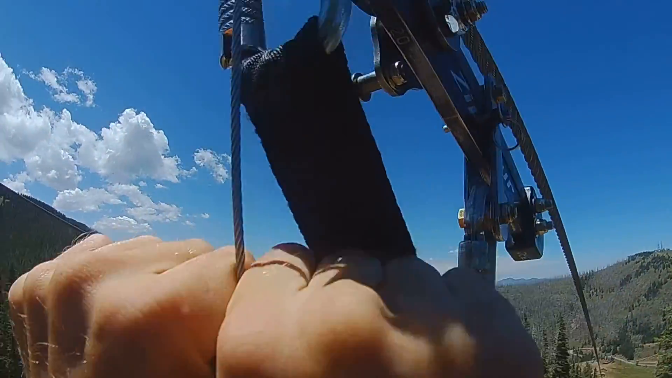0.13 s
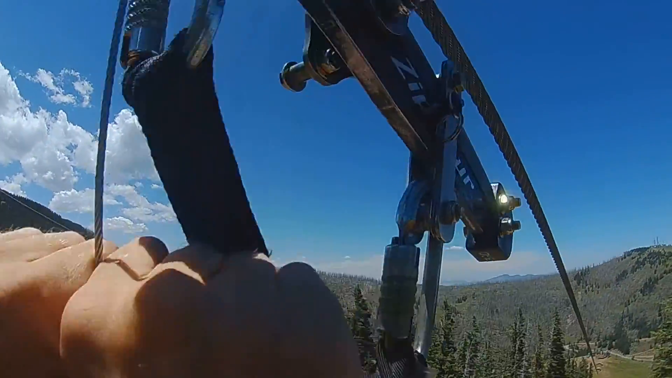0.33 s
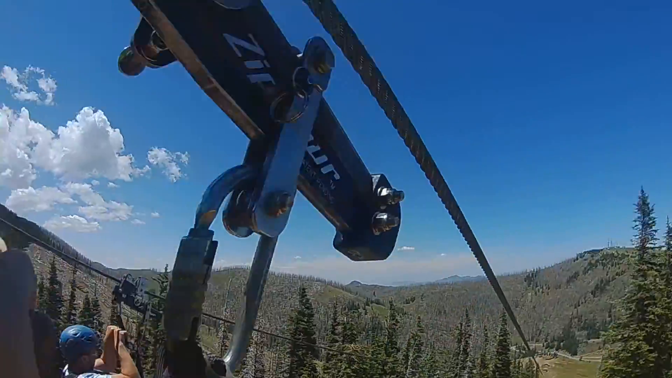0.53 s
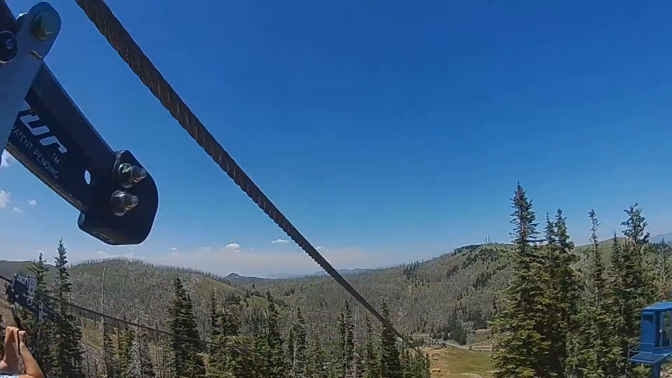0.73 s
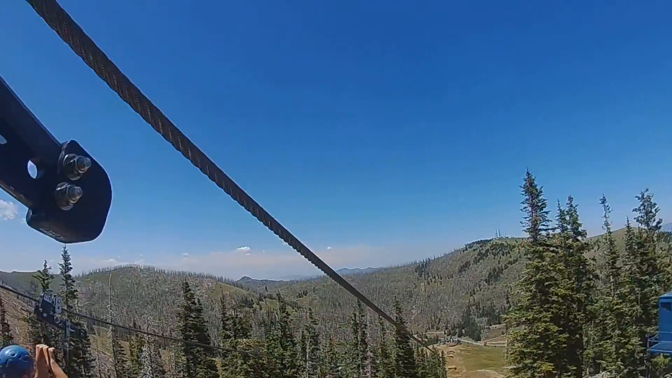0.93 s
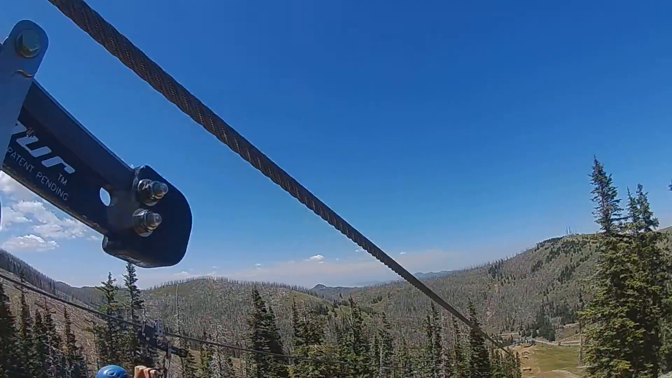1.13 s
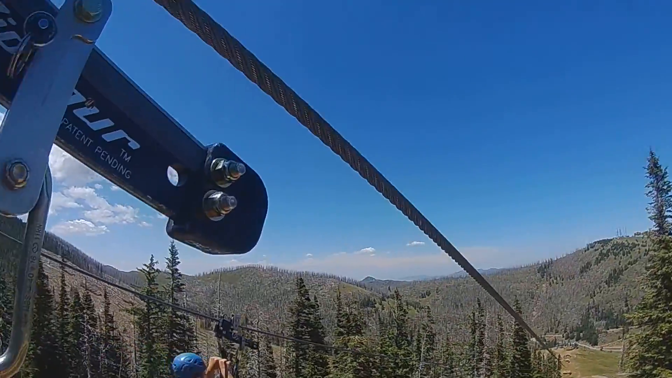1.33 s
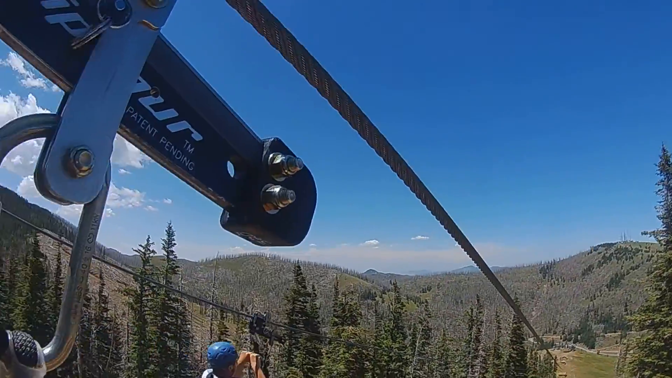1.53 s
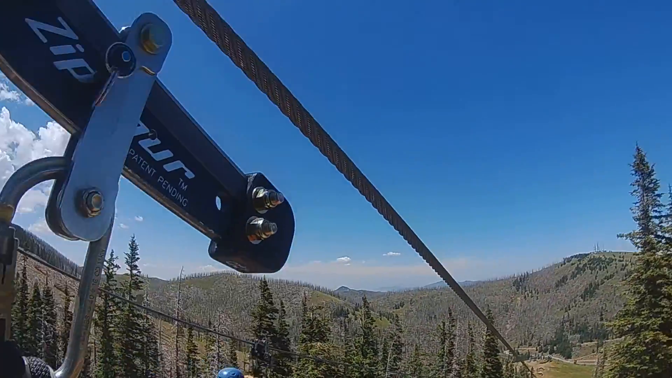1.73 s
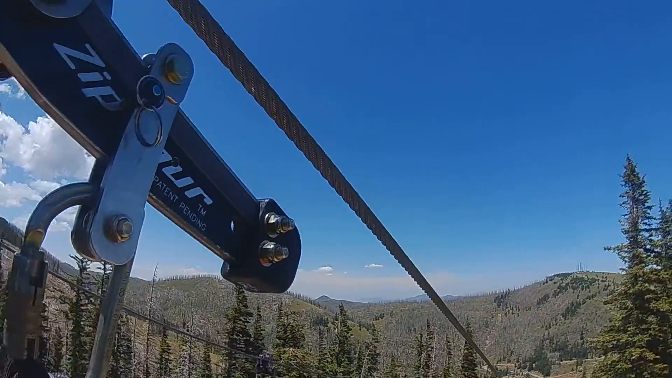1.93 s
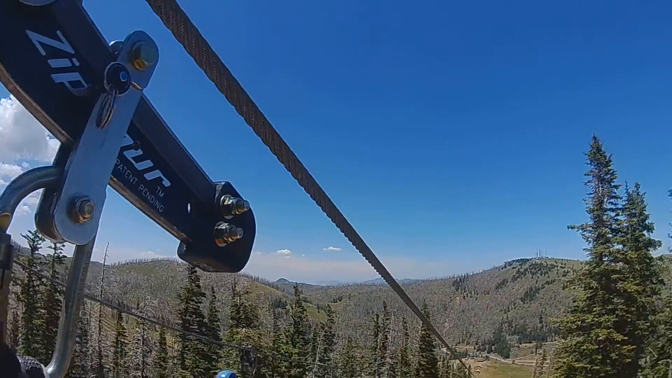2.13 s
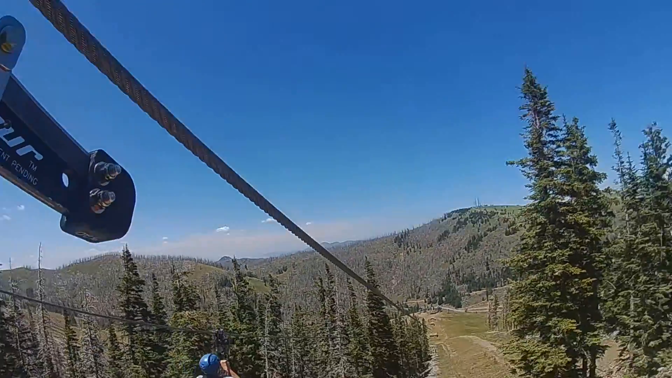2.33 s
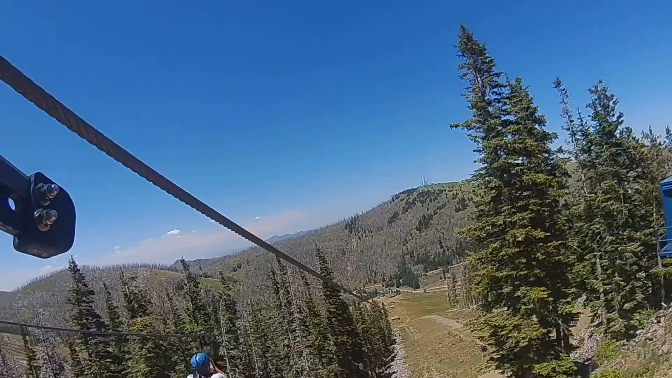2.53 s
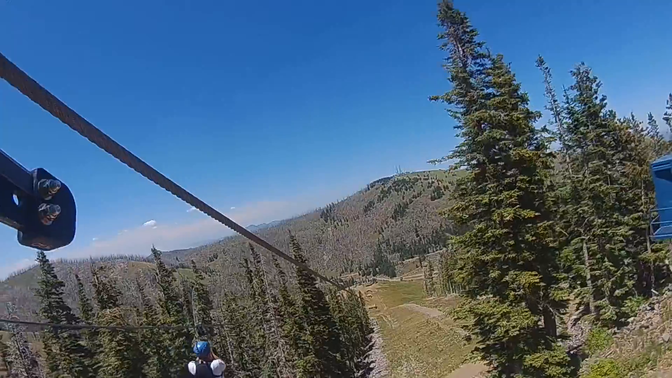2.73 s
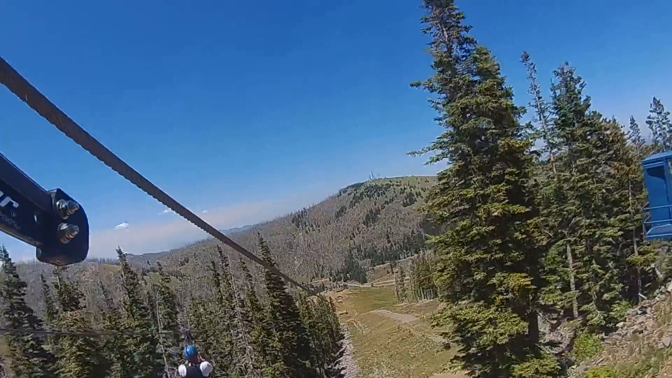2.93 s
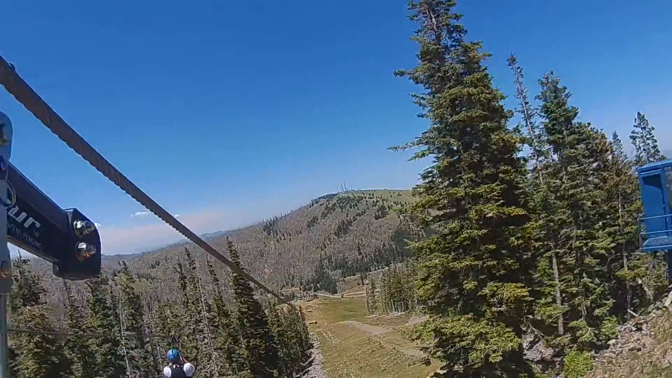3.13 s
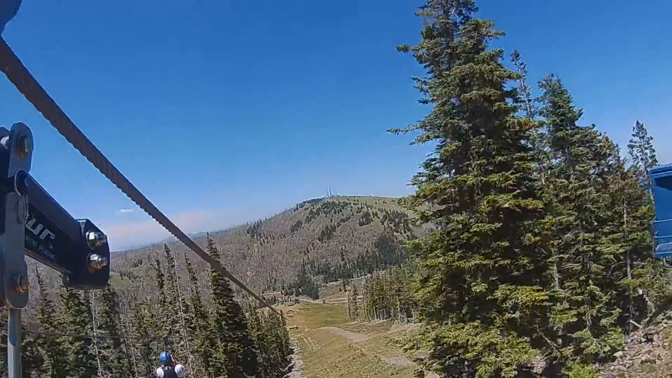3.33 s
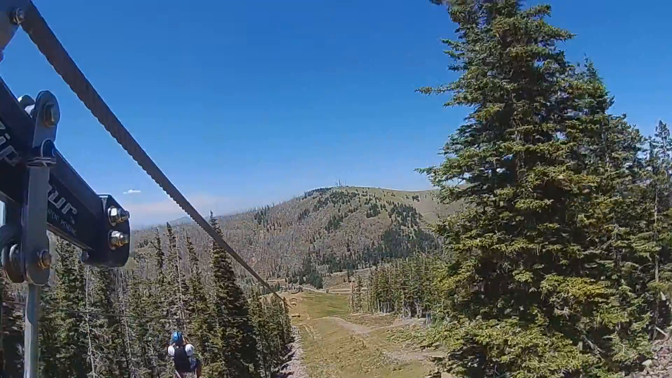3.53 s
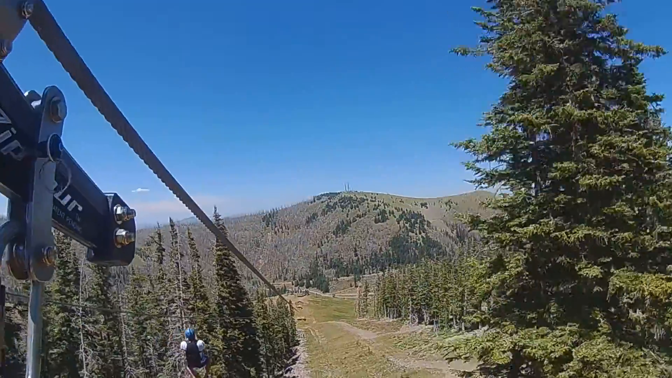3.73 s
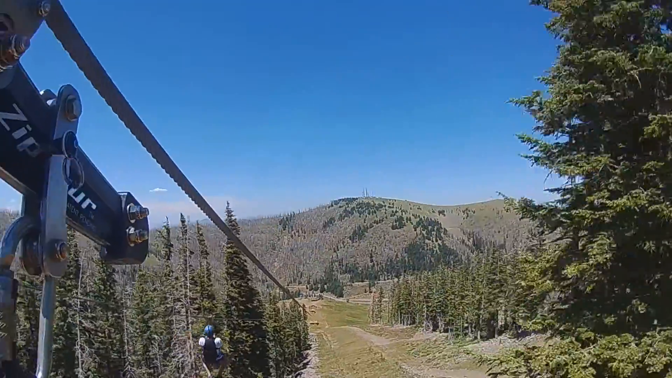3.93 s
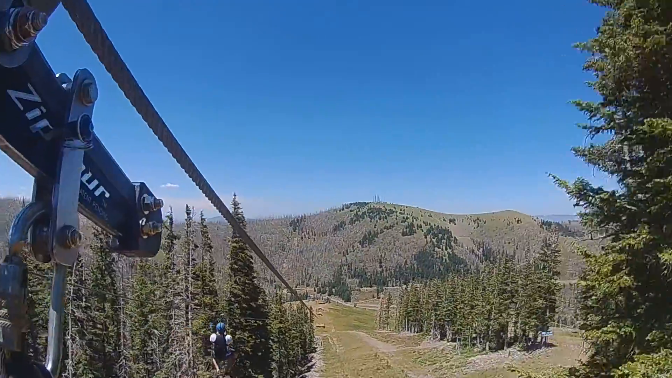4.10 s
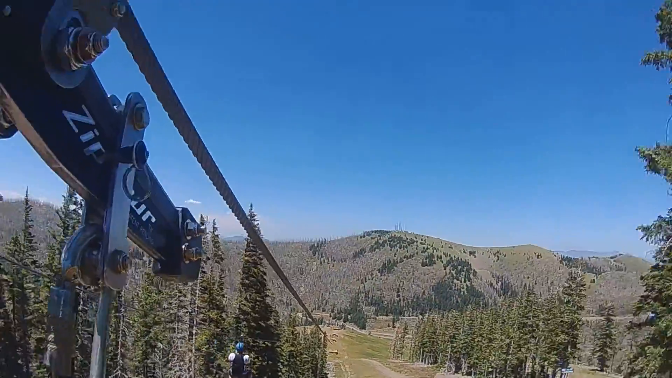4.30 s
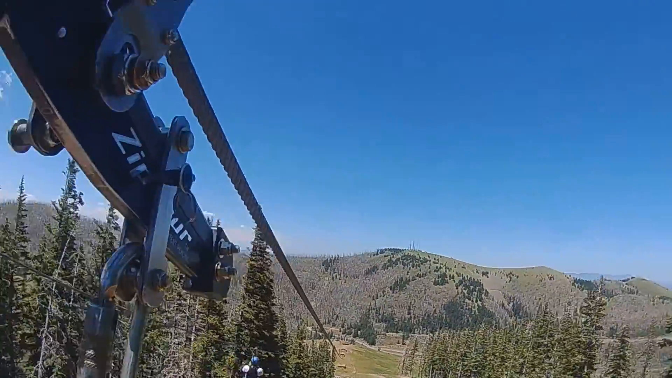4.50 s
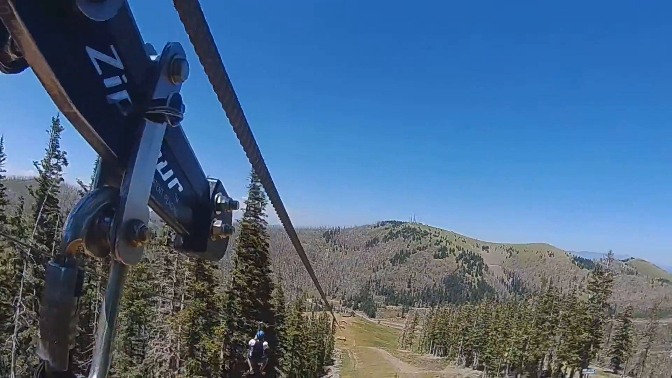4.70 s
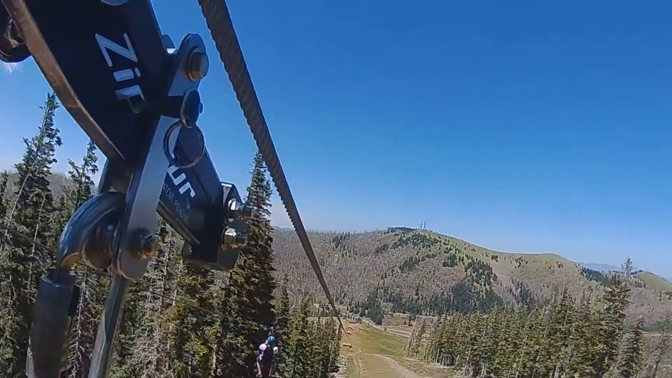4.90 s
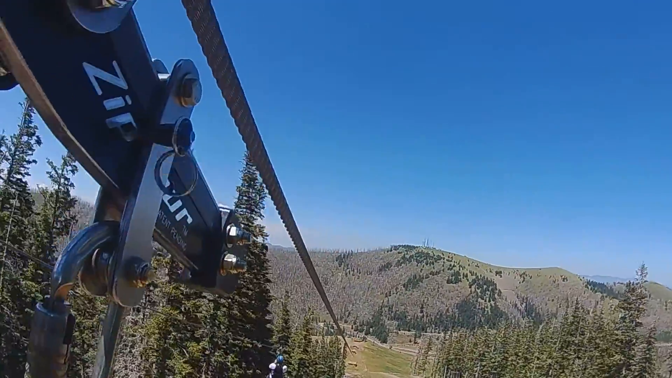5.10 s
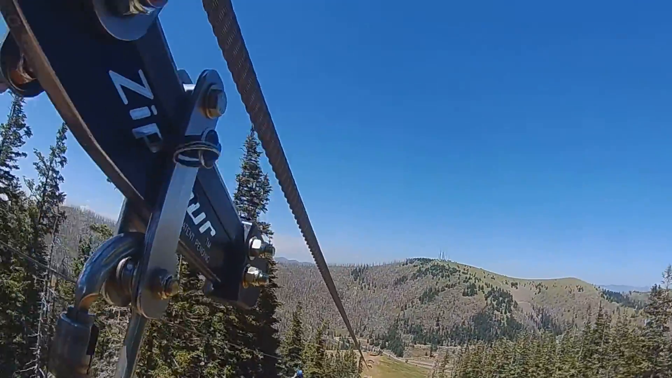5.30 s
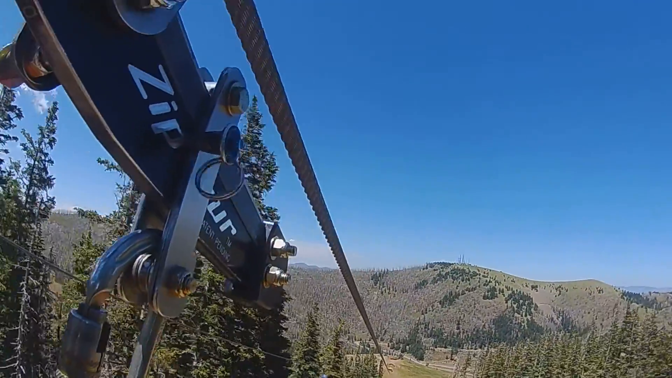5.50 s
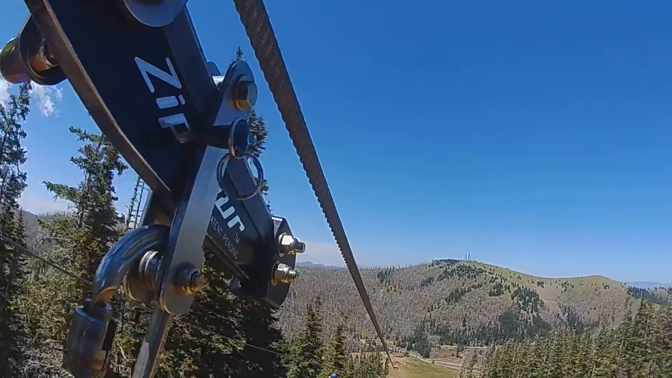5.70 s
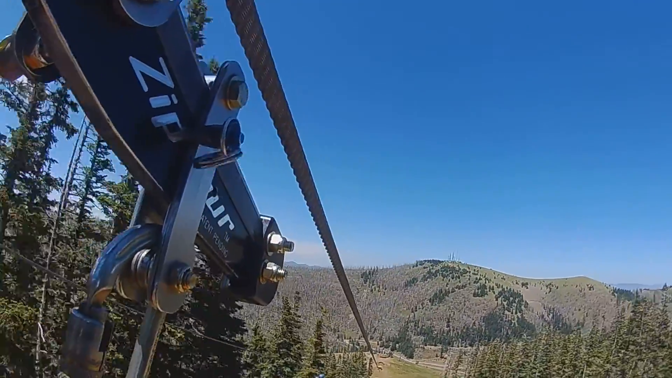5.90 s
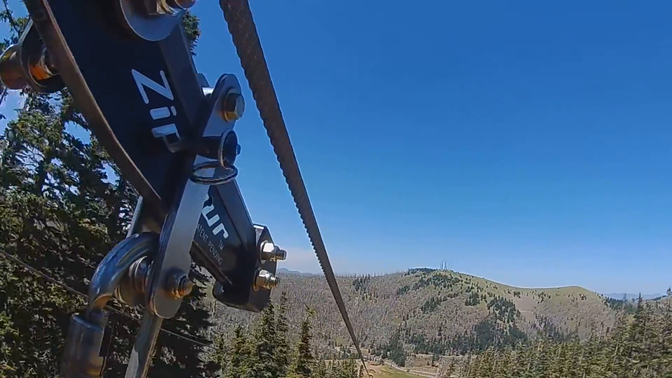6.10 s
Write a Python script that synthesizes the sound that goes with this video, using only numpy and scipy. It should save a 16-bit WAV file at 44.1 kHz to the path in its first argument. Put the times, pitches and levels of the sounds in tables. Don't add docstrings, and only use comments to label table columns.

```python
import sys
import numpy as np
from scipy import signal
from scipy.io import wavfile
from scipy.ndimage import uniform_filter1d, minimum_filter1d

SR = 44100
rng = np.random.default_rng(int(sys.argv[2]) if len(sys.argv) > 2 else 0)


def linear_from_db(decibels):
    return 10 ** (np.asarray(decibels, float) / 20)


def materialize(psi):
    bounded = np.clip(np.atleast_2d(psi).T, -1, 1)
    quanta = np.round(bounded * 32767).astype(np.int16)
    wavfile.write(sys.argv[1], SR, quanta)


N = 271215
SPEED_REF_HZ, SHAKE_REF_DB = 400, -20


def evened(x):
    return x / np.sqrt(np.mean(x ** 2) + 1e-20)


def curves(rows):
    s, *columns = np.transpose(rows)
    return [np.interp(np.arange(N) / SR, s, column) for column in columns]


def band(x, lo_hz, hi_hz):
    return signal.sosfilt(signal.butter(2, [lo_hz, hi_hz], "bandpass", fs=SR, output="sos"), x)


def drift(rate_hz):
    return evened(band(rng.standard_normal(N), 0.053 * rate_hz, rate_hz))


def ring(modes):
    t = np.arange(4096) / SR
    soft_start = 1 - np.exp(-t / 0.00083)
    response = 0
    for k, (hz, width, db) in enumerate(modes):
        decay = np.exp(-np.pi * width * t)
        response = response + (-1) ** k * linear_from_db(db) * width * decay * np.sin(2 * np.pi * hz * t) * soft_start
    return response


def colour(points):
    hz, db = np.transpose(points)
    f = abs(np.fft.fftfreq(8192, 1 / SR))
    log_gain = np.log(linear_from_db(np.interp(np.log(f + 1), np.log(hz), db)))
    return np.fft.ifft(np.exp(np.conj(signal.hilbert(log_gain)))).real[:4096]


def strike(force, shape):
    return signal.oaconvolve(force, shape / abs(shape).max())[:N]


def pulses(s, height):
    out = np.zeros(N)
    np.add.at(out, np.round(s * SR).astype(int), height)
    return out


def spell(start, end, db, ease):
    t = np.arange(N) / SR
    return db * np.clip(np.minimum(t - start, end - t) / ease + .5, 0, 1)


# time in seconds, strands passing the wheel in Hz.
STRAND_SPEED = [(0.0, 88.1), (0.5, 119.8), (1.0, 146.0), (1.5, 175.9), (2.0, 199.7), (2.5, 245.4),
                (3.0, 284.7), (3.5, 338.3), (4.0, 387.4), (4.5, 440.2), (5.0, 488), (5.5, 523),
                (6.15, 560.6)]


def strand_speed():
    return curves(STRAND_SPEED)[0]


# time in seconds, shake of the frame in dB, slack of the fittings in dB.
RIDE = [(0, -28.5, -3), (.35, -25, -2), (.55, -27, 0), (.9, -25.5, 1), (1.25, -27, -2.5), (1.5, -23.5, 3),
        (1.8, -25, 2), (2.05, -21, 2), (2.3, -24.5, 1), (2.63, -23, -0.5), (2.7, -23.5, -0.5),
        (3.2, -21, -0.5), (3.7, -20, 0.5), (4.2, -17.5, -2), (4.55, -16, 0), (5, -14, 1.5), (5.5, -14, 4.5),
        (6.15, -13, 3.5)]


def ride():
    return curves(RIDE)


# start in seconds, end in seconds, gain in dB, ease in seconds.
PRESSES = [
    (.58, 1.22, 5, .05),
    (2.2, 2.68, 10, .06),
    (2.68, 3.65, 3.5, .1),
]


def press():
    return sum(spell(*row) for row in PRESSES)


def hand():
    return spell(-1, .56, -4, ease=.03)


def contact():
    pace = strand_speed() / SPEED_REF_HZ
    knocks_per_s = 450 * (1 + 1.5 * pace ** 2.4)
    grit = np.clip(.45 + .5 * np.maximum(pace - .6, 0), 0, 1)
    clumps = linear_from_db(0.55 * drift(36) + 1.0 * drift(100))
    size_db = 2.2 * np.minimum(rng.exponential(1, N), 2)
    hits = (rng.random(N) < knocks_per_s / SR) / np.sqrt(knocks_per_s)
    forces = []
    for part in range(11):
        spot_db = rng.uniform(-1.5, 2.6, N)
        knock = evened(hits * linear_from_db(size_db + spot_db) * rng.choice([-1, 1], N))
        steady = rng.standard_normal(N) * linear_from_db(0.64 * drift(14))
        forces.append(clumps * (np.sqrt(1 - grit) * knock + np.sqrt(grit) * steady))
    return forces


# level in dB at the reference ride, share of shake,
# rise in dB per doubling of speed, share of slack.
PARTS = [
    (-24.5, 1.3, -0.5, 0.36),
    (-25.5, 0.83, 3.5, 0.4),
    (-32, 0.085, 5, -.1),
    (-31.5, 1.24, -0.45, 0.92),
    (-37.5, 0.64, 4, .4),
    (-42.5, 0.067, 3.5, 1.1),
    (-31.5, 0.52, 5, 0.38),
    (-54, 1.22, 1.5, 1.3),
]


def part_levels():
    shake_db, slack_db = ride()
    shake_db = shake_db - SHAKE_REF_DB
    doublings = np.log2(strand_speed() / SPEED_REF_HZ)
    levels = []
    for db, share, rise, loose in PARTS:
        levels.append(db + share * shake_db + rise * doublings + loose * slack_db)
    levels[2] = levels[2] + press()
    levels[5] = levels[5] + hand()
    levels[7] = levels[7] + hand()
    main_wheel = levels[0] + 0.5 + 2.5 * doublings
    upper_wheel = levels[3] + 2.5 * doublings
    loose_bolts = spell(1.28, 2.22, 5.5, ease=.04)
    bolts = -68 + shake_db + loose_bolts + hand()
    return levels + [main_wheel, upper_wheel, bolts]


def jolts():
    s, _, _, jolt_db = np.transpose(KNOCKS)
    t = np.arange(4410) / SR
    shape = np.minimum(t / 0.0019, 1) * np.exp(-(t / 0.011) ** 2)
    slow_lift_db = 1 * np.clip(1 - strand_speed() / SPEED_REF_HZ, 0, 1)
    return signal.oaconvolve(pulses(s, jolt_db), shape)[:N] + slow_lift_db


# pitch in Hz, width in Hz, level in dB.
FRAME = [
    [(1985, 132, 0)],
    [(1236.3, 104, 5), (1158, 60, -8)],
    [(2262, 118, 0)],
    [(3621, 165, -2.5), (3070, 230, -9.5)],
    [(4210, 360, -2), (4846, 230, -2)],
    [(5240, 290, 0.5), (5340, 280, -3), (5786, 150, -3), (6265, 350, -8)],
]
# pitch in Hz, width in Hz, level in dB.
WHEEL = [
    [(1910, 102, 1), (1720, 77, -10)],
    [(2807, 77, -3), (3210, 1200, -4), (3400, 284, 2)],
]
# pitch in Hz, width in Hz, level in dB.
BOLTS = [(8770, 450, 0), (9960, 600, -3.5), (12200, 500, -9)]
# frequency in Hz, gain in dB.
SHELL = [(90, -36.5), (200, -25), (420, -10.5), (520, -10.5), (600, 0), (660, -7), (850, -1.5), (1000, -5),
         (1600, 3.5), (2600, -9), (4000, -49)]
# frequency in Hz, gain in dB.
SHEEN = [(3000, -10.5), (6500, 0.5), (7200, -1), (8600, -10), (10500, -17), (12400, -14), (15500, -13.5)]
JOLT_SHARE = (0.91, .7, 0.68, 1.3, 1.5, 1.2, .7, 1.4, 1.2)


def frame():
    shapes = [ring(modes) for modes in FRAME]
    shapes += [colour(SHELL), colour(SHEEN)]
    shapes += [ring(modes) for modes in WHEEL + [BOLTS]]
    shares = list(JOLT_SHARE[:8]) + [JOLT_SHARE[0], JOLT_SHARE[3], JOLT_SHARE[8]]
    jolt_db = jolts()
    out = np.zeros(N)
    for db, share, force, shape in zip(part_levels(), shares, contact(), shapes):
        level_db = db + share * jolt_db + 1.2 * drift(30)
        out += linear_from_db(level_db) * evened(signal.oaconvolve(force, shape)[:N])
    return out


def rush():
    rush_db = -76.5 + 7 * strand_speed() / 100 + 0.35 * ride()[1] + 2.0 * drift(21)
    return evened(band(rng.standard_normal(N), 108, 437)) * linear_from_db(rush_db)


# time in seconds, length in seconds, swell over the breeze in dB.
GUSTS = [(0.028, 0.088, 8), (0.298, 0.18, 3.5), (0.856, .08, 6), (1.147, .15, 1.5), (1.76, 0.037, 1),
         (2.3, .1, 3), (2.6, 0.15, 9.5), (2.95, .12, 6), (3.321, .06, 9), (3.58, .08, 11), (4.05, 0.087, 7),
         (4.256, 0.073, 7), (5.06, .06, 3), (6.002, .2, 6.5)]


def gusts():
    t = np.arange(N) / SR
    return sum(db * np.exp(-((t - s) / length) ** 2) for s, length, db in GUSTS)


def buffeting():
    low = band(band(rng.standard_normal(N), 42, 88), 40, 100)
    return evened(low) * linear_from_db(-58 + gusts() + 1.3 * drift(4.5))


# time in seconds, peak in dB, upper rings against it in dB,
# jolt to the rattle in dB.
KNOCKS = [(0.1464, -13, -34.5, 1), (0.2064, -13, -22, 3), (0.2358, -10.5, -27.5, 4),
          (0.287, -16, -16.5, -1), (0.3408, -13, -19.5, 2), (0.603, -18, -16.5, 5), (0.6424, -19, -3.5, -6),
          (0.6884, -16.5, -6, 1), (0.7716, -17, -12, 2), (0.9534, -11, -20.5, -8), (1.1505, -20, -6.5, 8),
          (1.2286, -19, -9.5, 0), (1.297, -7, -17, 5.5), (1.4002, -9.5, -20.5, 4), (1.4456, -26, -13, 1),
          (1.6874, -17, -13.5, 4.5), (1.7896, -11, -19.5, 4), (1.8761, -10, -10, -6),
          (1.9116, -12, -16, -3), (1.948, -12.5, -15, 2), (2.2573, -9, -20, 4.5), (2.286, -14, -27, 5.5),
          (2.4019, -18, -20, 3.5), (2.4813, -7.5, -24.5, -6), (2.651, -5, -24.5, -5),
          (2.7247, -14, -19.5, -2), (2.835, -18, -13.5, 2), (3.1097, -12, -12.5, 2),
          (3.251, -12.5, -11.5, -5), (3.271, -20, -15.5, -2)]


def knocks():
    s, peak_db, upper_db, _ = np.transpose(KNOCKS)
    taps_per_s, mix_db = 70, 4.5
    at = np.flatnonzero(rng.random(N) < taps_per_s / SR)
    speed = strand_speed()
    tap_db = ride()[0][at] + 7.5 - 1.5 * np.log2(speed[at] / speed[0])
    s = np.append(s, at / SR)
    peak_db = np.append(peak_db, tap_db)
    upper_db = np.append(upper_db, upper_db.mean() + mix_db * rng.standard_normal(len(at)))
    low_db = -20 + mix_db * rng.standard_normal(len(s))
    plate_db = -13.5 + mix_db * rng.standard_normal(len(s))
    ring_mix = (-3.5, low_db, plate_db, upper_db + 5.0, upper_db - 11.5, upper_db - 15)

    tick_db = -27
    out = strike(pulses(np.minimum(s, 6.1), linear_from_db(peak_db + tick_db)), colour(SHEEN))
    t = np.arange(300) / SR
    places = np.round(s * SR).astype(int)[:, None] + np.arange(300)
    for db, modes in zip(ring_mix, FRAME):
        chatter = rng.standard_normal((len(s), 300)) * np.exp(-t / 0.0016) * 0.079
        chatter[:, 0] = 1
        force = np.zeros(N + 300)
        np.add.at(force, places, linear_from_db(peak_db + db)[:, None] * chatter)
        out += strike(force, ring(modes))
    return out


# time in seconds, peak in dB.
PINGS = [(0.4384, -23), (0.4898, -22.5), (0.6973, -20), (1.2491, -20.5), (1.4536, -25), (1.5883, -25),
         (1.7903, -27), (2.0567, -26)]
# pitch in Hz, width in Hz, level in dB.
PING_RING = [(3627, 60, 0)]


def pings():
    s, peak_db = np.transpose(PINGS)
    return strike(pulses(s, linear_from_db(peak_db + 0.5)), ring(PING_RING))


def strands_passed():
    return np.cumsum(strand_speed() * (1 + .003 * drift(6) + .006 * drift(60))) / SR


def tone(cycles, db):
    return np.sqrt(2) * linear_from_db(db + 1.8 * drift(8)) * np.sin(2 * np.pi * (cycles + rng.random()))


# order, level in dB at rest, rise in dB per 100 Hz of speed, share of slack,
# share of the hard press.
TONES = [
    (1, -79, 7.5, .2, -.3),
    (2, -74, 8.2, .2, -1.1),
    (3, -78, 8.5, .3, -.3),
]


def whine(strands):
    speed, slack_db = strand_speed(), ride()[1]
    t = np.arange(N) / SR
    seat_db = -8 * np.clip((1.25 - t) / .4, 0, 1)
    out = np.zeros(N)
    for order, db, rise, loose, damp in TONES:
        level_db = db + rise * speed / 100 + loose * slack_db + damp * spell(*PRESSES[1]) + seat_db
        out += tone(order * strands, level_db)
    return out


def hum(strands):
    mount_hz = 72
    octaves = np.log2(strand_speed() / 6 / mount_hz)
    t = np.arange(N) / SR
    hum_db = -44.5 + np.minimum(16.5 * octaves, -40 * octaves)
    hum_db = np.maximum(hum_db, -51.5) + 0.69 * gusts()
    fade_in_db = -40 * np.clip(2.95 - t, 0, 1)
    return tone(strands / 6, hum_db + fade_in_db)


def bump():
    t = np.maximum(np.arange(N) / SR - 2.712, 0)
    t60 = .15
    return linear_from_db(-41 - 60 * t / t60) * np.sin(2 * np.pi * 200 * t) * (1 - np.exp(-t / .008))


def scene():
    strands = strands_passed()
    rattle = frame() + knocks() + pings()
    cable = whine(strands) + hum(strands)
    wind = rush() + buffeting()
    return (rattle + cable + wind + bump())[None]


def top_cut(x):
    return signal.sosfilt(signal.butter(12, 16900, fs=SR, output="sos"), x)


# frequency in Hz, gain in dB.
PORT = [(6500, -1.5), (8000, -5.5), (10500, -8.5), (12400, -12), (13000, -13), (13800, -23.5),
        (14300, -12.5), (15500, -8)]


def record(dry):
    dry = signal.oaconvolve(dry, colour(PORT)[None])[:, :N]
    ceiling, knee = .58, 6
    peak = -minimum_filter1d(-abs(dry), size=60)
    gain = (1 + (peak / ceiling) ** knee) ** (-1 / knee)
    held = dry * uniform_filter1d(gain, size=50)
    edge = signal.firwin(1023, 15720, window=("kaiser", 9), fs=SR)
    return top_cut(signal.oaconvolve(held, edge[None], "same"))


dry = scene()
out = record(dry)
materialize(out)
```